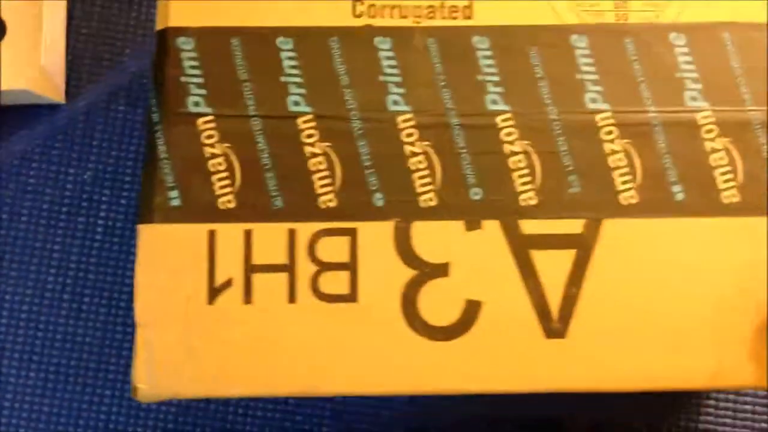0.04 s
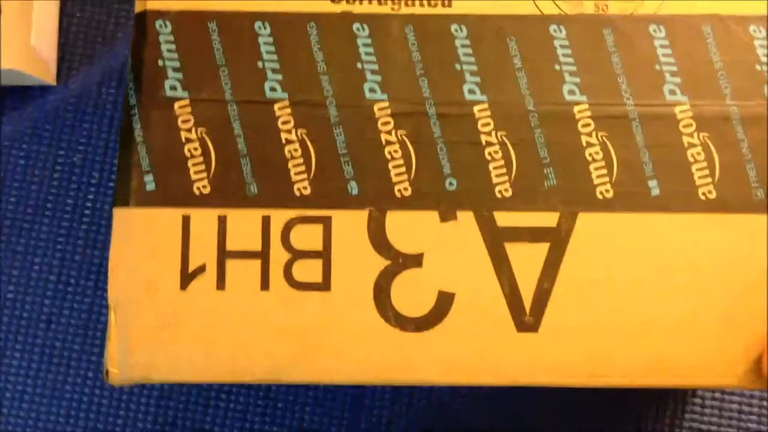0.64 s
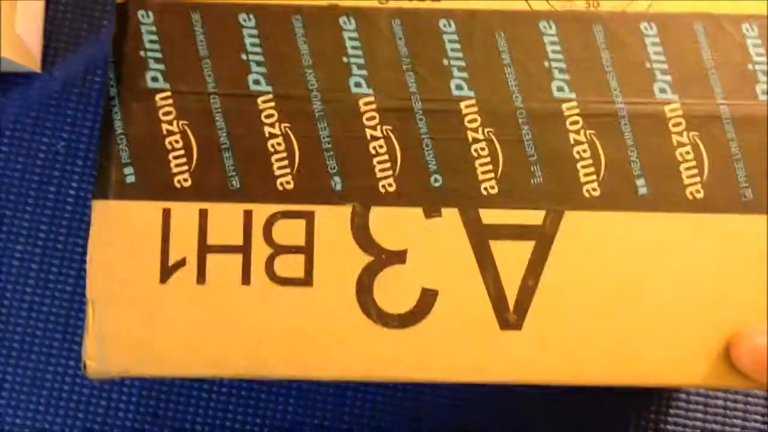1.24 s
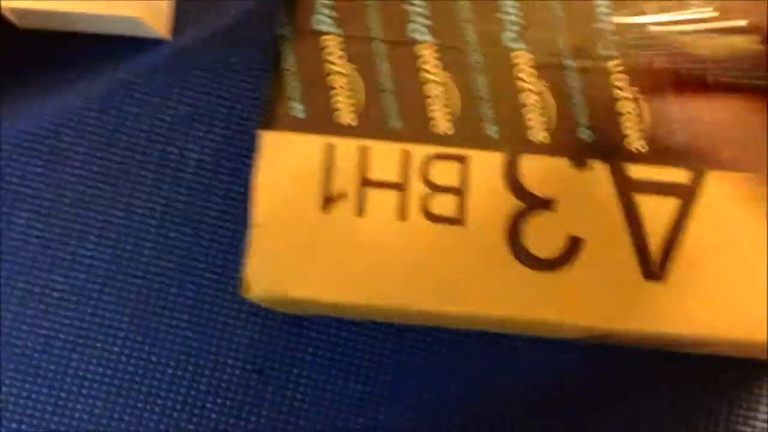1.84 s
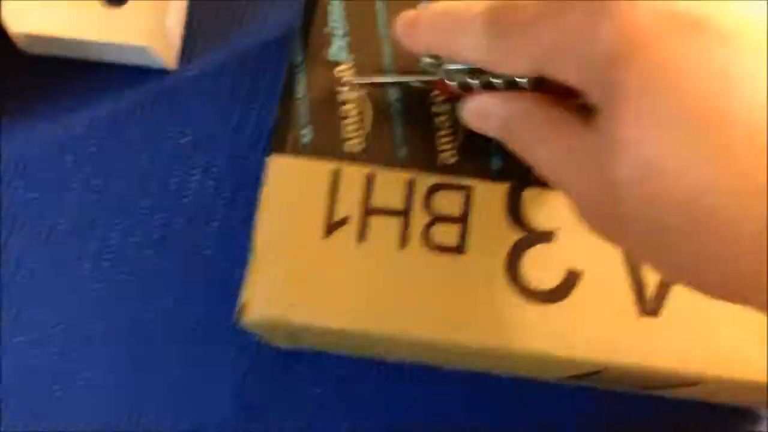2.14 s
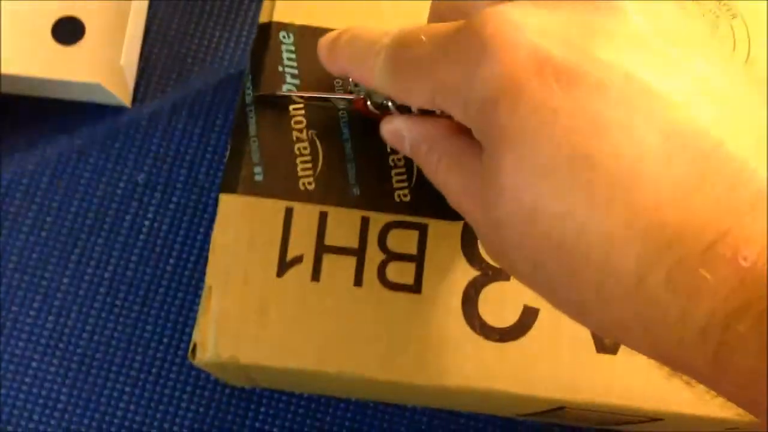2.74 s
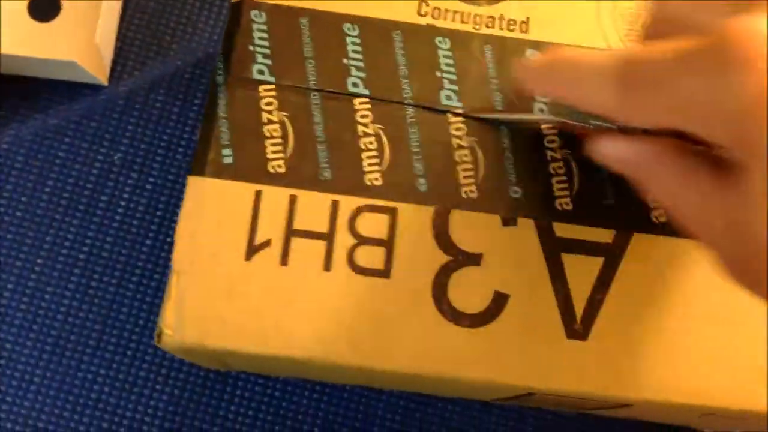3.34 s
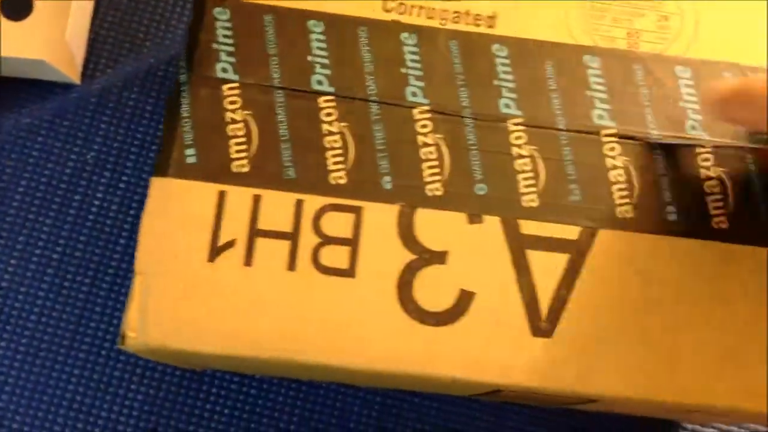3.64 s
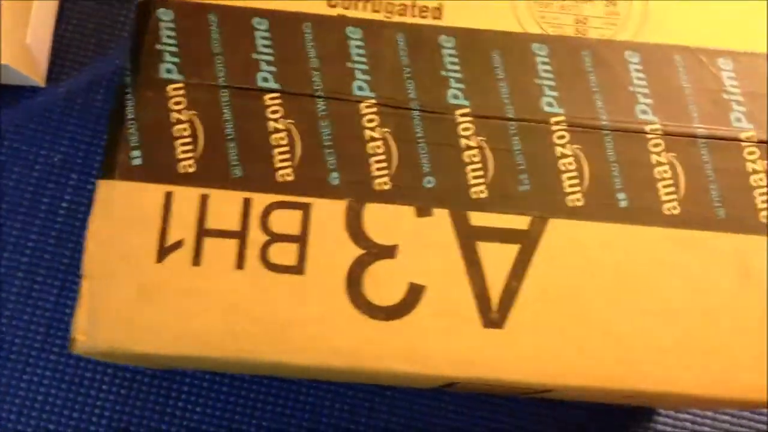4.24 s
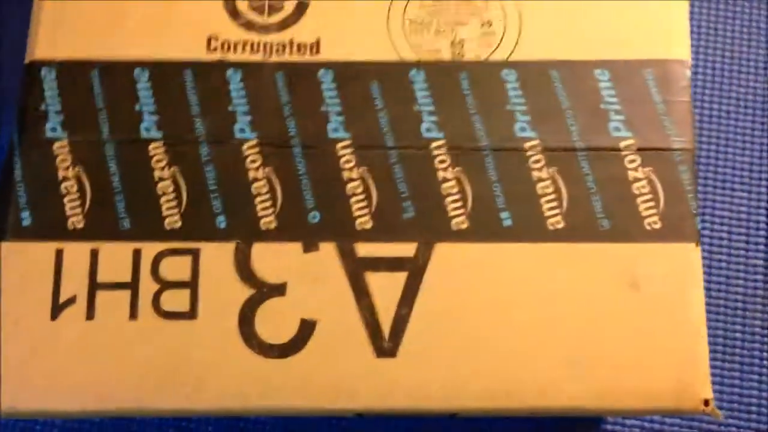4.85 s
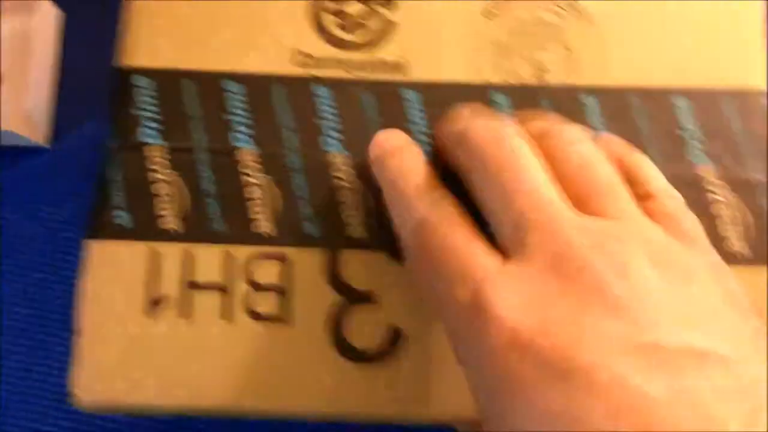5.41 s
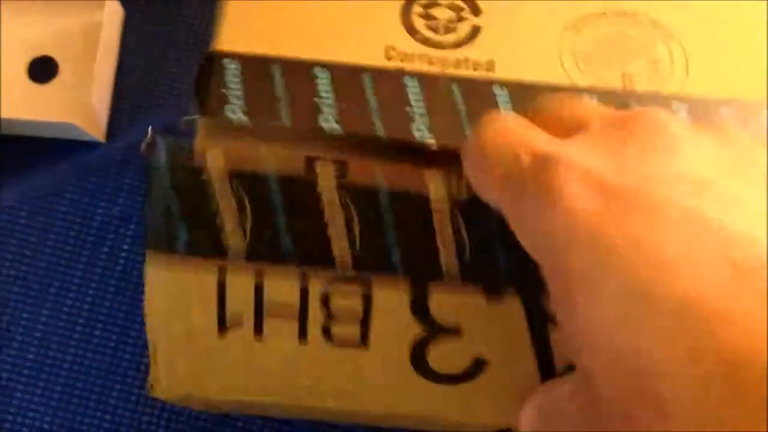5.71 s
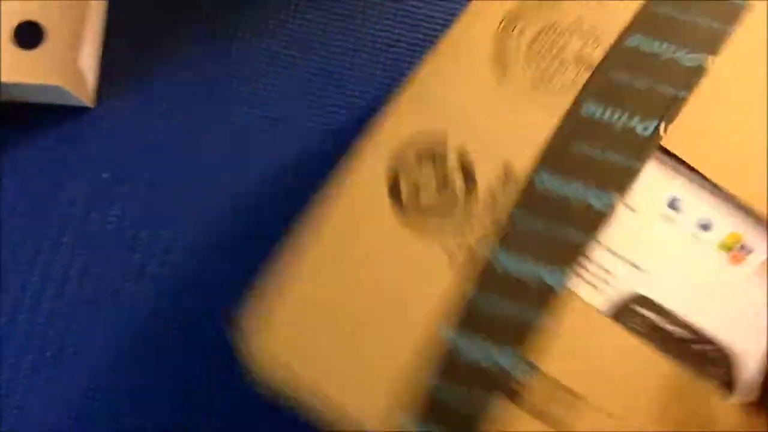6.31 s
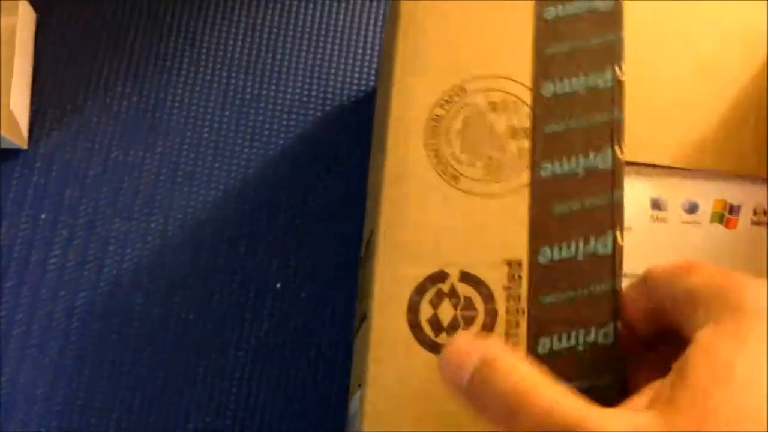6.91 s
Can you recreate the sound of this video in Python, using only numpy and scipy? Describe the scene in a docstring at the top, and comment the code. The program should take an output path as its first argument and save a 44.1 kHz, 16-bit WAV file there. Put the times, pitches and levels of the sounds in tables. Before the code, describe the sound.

Close cardboard scraping and a few tool clicks lead to a rasping cut through packing tape and flaps pulled loose.

```python
"""A small dry room, one microphone close to a taped cardboard box on a floor mat.
Something scrapes over the box; a small blade is picked up with a few clicks, pierces the tape and
slits the seam. The flaps pull loose with snaps and a squeak, and the box is turned round.
Friction is a stream of tiny slips and a snap a burst of breaking fibres, both coloured by the box;
underneath, the box bumps and rumbles on the mat."""
import sys
import numpy as np
from scipy import signal
from scipy.fft import rfft, irfft
from scipy.io import wavfile
from scipy.ndimage import uniform_filter1d

SR = 44100
rng = np.random.default_rng(int(sys.argv[2]) if len(sys.argv) > 2 else 0)


def waveform_to_disk(signal):
    """Save audio, clipped to [-1, 1], as 16-bit WAV at the path in sys.argv[1]."""
    frames = np.transpose(np.atleast_2d(signal))
    scaled = np.clip(frames, -1, 1) * 32767
    samples = np.round(scaled).astype(np.int16)
    wavfile.write(sys.argv[1], SR, samples)


N = 311774
TIME = np.arange(N) / SR


def from_db(db):
    """Decibels to gain."""
    return 10 ** (np.asarray(db) / 20)


def rms_one(x):
    """Scale to rms 1."""
    return x / np.sqrt(np.mean(x ** 2) + 1e-20)


def add(out, start_s, sound):
    """Mix a sound in at start_s."""
    start = int(start_s * SR)
    out[start:start + len(sound)] += sound[:N - start]


def band(x, edges_hz, kind="band"):
    """Steep causal band- or high-pass."""
    return signal.sosfilt(signal.butter(4, edges_hz, kind, fs=SR, output="sos"), x + 1e-18)


def coloured(x, spectrum):
    """Causal (minimum-phase) filter with the given spectrum."""
    size = 4096
    hz, db = np.transpose(spectrum)
    grid_hz = np.maximum(np.arange(size // 2 + 1) * SR / size, 1)
    gain = from_db(np.interp(np.log(grid_hz), np.log(hz), db))
    cepstrum = irfft(np.log(gain))
    cepstrum[1:size // 2] *= 2
    cepstrum[size // 2 + 1:] = 0
    return signal.fftconvolve(x, irfft(np.exp(rfft(cepstrum))))[:len(x)]


def drift(rate_hz, size=N):
    """A random wander of rms 1."""
    knots = rng.standard_normal(int(size / SR * rate_hz) + 2)
    return rms_one(np.interp(TIME[:size] * rate_hz, np.arange(len(knots)), knots))


def grains(per_s, spread_db, size):
    """Fibres letting go at random moments: many small clicks, a few large ones."""
    sizes = from_db(spread_db * np.minimum(rng.exponential(1, size), 4))
    return (rng.random(size) < per_s / SR) * sizes * rng.choice([-1, 1], size)


def ring(x, modes):
    """Sum of damped sines set off by x."""
    out = 0
    for hz, db, t60_s in modes:
        r, w = from_db(-60 / (t60_s * SR)), 2 * np.pi * hz / SR
        out = out + from_db(db) * signal.lfilter([0, np.sin(w)], [1, -2 * r * np.cos(w), r * r], x + 1e-18)
    return out


# Resonances and dips of the box as heard at the microphone, including a narrow microphone notch
# near 2.7 kHz: centre_hz, width_hz, gain_db
BOX_AT_MICROPHONE = [(164, 18, 2), (211, 15.6, 5), (267, 14, 4.5), (314, 21, 2), (398, 54, 7.5),
                     (621, 20, 5), (811.5, 36, 5.5), (1228, 410, -8.5), (1510, 63, 4), (1784, 270, 4),
                     (2110, 180, 3.5), (2390, 47, 5.5), (2736, 164, -13), (3086, 150, -5), (4120, 590, 3.5),
                     (5400, 170, 2)]
def box(x):
    """Colour a force on the cardboard with the box's resonances and dips and the microphone's notch."""
    for hz, width_hz, db in BOX_AT_MICROPHONE:
        half, tuning = np.pi * width_hz / SR, -2 * np.cos(2 * np.pi * hz / SR)
        zero, pole = half * from_db(max(db, 0)), half * from_db(max(-db, 0))
        x = signal.lfilter([1 + zero, tuning, 1 - zero], [1 + pole, tuning, 1 - pole], x)
    return x


# Edges of the cardboard's registers: low_hz, knock_hz, middle_hz, high_hz, top_hz
REGISTERS_HZ = [70, 300, 1100, 2700, 7000]
def treble(x, brightness_db):
    """The hiss of x, rms 1; brightness is its top register against the one below."""
    high, top = REGISTERS_HZ[3:]
    gain = from_db(brightness_db)
    lower, upper = rms_one(band(x, [high, top])), rms_one(band(x, top, "high"))
    return (lower + gain * upper) / np.sqrt(1 + gain ** 2)


# Room tone at the microphone: frequency_hz, level_db
AIR_COLOUR = [(15, -39), (30, -12), (62, 1), (110, -9), (170, -16.5), (350, -19.5), (800, -22.5),
              (1400, -20.5), (1950, -21), (2700, -29), (3900, -25), (15000, -30)]
def room_tone(level_db=-59.5):
    """The still air of the room, a faint low noise."""
    return from_db(level_db) * rms_one(coloured(rng.standard_normal(N), AIR_COLOUR))


# Low modes of the top panel: pitch_hz, level_db, t60_s
PANEL_MODES = [(100, -7, .08), (165, -3.5, 0.076), (213.8, -2.5, 0.099), (260, -0.5, 0.11),
               (324, -5.5, 0.087)]
# Cardboard tapped, pierced or torn: time_s, tearing_s, level_db, hardness_db, thump_db, thump_hz
CARDBOARD_SNAPS = [(0.331, 0.0046, -73, -4, -51.5, 173), (0.526, 0.0079, -42.5, -2.5, -32, 240),
                   (0.753, .009, -37.5, 1.5, -40.5, 236), (0.978, 0.0047, -43, 4.5, -45.5, 150),
                   (1.006, 0.0099, -37, 3, -40.5, 164), (1.311, .006, -36, 1, -39, 169),
                   (2.402, 0.0099, -64.5, -5.5, -52, 180), (2.453, .014, -58.5, -3, -44, 166),
                   (2.508, 0.0064, -58, -4.5, -42.5, 186), (2.569, .004, -63, -13, -40, 160),
                   (2.631, 0.0045, -68, -8, -70, 170), (2.697, 0.0066, -55.5, -1.5, -59, 185),
                   (3.143, 0.0047, -27.5, 1, -24.5, 250), (3.153, 0.0079, -27, -3, -21, 260),
                   (3.497, 0.0056, -30, -4, -23.5, 260), (4.122, 0.0044, -32, -4.5, -21.5, 273),
                   (4.985, 0.0045, -55, -3.5, -49, 170), (5.357, 0.0056, -60, -4, -46, 141),
                   (5.451, .003, -52, -0.5, -56, 160), (5.4783, .0016, -41, -8, -31, 197),
                   (5.528, 0.0057, -45.5, -3, -60, 169), (5.579, .0023, -33, -2, -35.5, 257),
                   (5.596, .011, -35, -7.5, -35, 290), (5.685, .004, -27, -2.5, -31, 261),
                   (5.7562, .0044, -21, -2, -20.5, 159), (5.833, .004, -43.5, -1, -46, 165),
                   (6.823, 0.013, -44, 2, -65, 200), (6.978, 0.0037, -35, -7, -28, 210)]
def snaps(panel_push=2.27, focus_db_per_octave=12.5, rustle_db=-19, rustle_s=0.016, board_db=2.5):
    """Fibres start to give, break, and go on tearing for a moment; the released panel thumps."""
    out, t = np.zeros(N), np.arange(-(SR // 50), SR // 6) / SR
    _, knock_hz, middle, high, _ = REGISTERS_HZ
    for time_s, tearing_s, level_db, hardness_db, thump_db, thump_hz in CARDBOARD_SNAPS:
        giving = .5 * np.exp(-np.abs(t) / (0.58 * tearing_s))
        dying = np.exp(-(t / tearing_s / 2) ** 2) + from_db(rustle_db) * np.exp(-np.abs(t) / rustle_s)
        tear = grains(per_s=6000, spread_db=3.0, size=len(t)) * np.where(t < 0, giving, dying)
        tear /= np.linalg.norm(tear)
        # quick snaps put more of their force into the first break
        jolt = (t == 0) * 0.84 * min(1, 0.0039 / tearing_s) ** 2
        push, skin = tear + panel_push * jolt, box(tear + jolt)
        # the spot that is hit favours the panel modes near one pitch
        modes = [(hz, db - focus_db_per_octave * abs(np.log2(hz / thump_hz)), t60_s)
                 for hz, db, t60_s in PANEL_MODES]
        thump = band(ring(push, modes), [thump_hz / 2, 2 * thump_hz])
        knock = band(box(push), [knock_hz, middle])
        board = band(skin, [middle, high])
        crack = treble(skin, brightness_db=-2.0)
        levels_db = thump_db, level_db - hardness_db, level_db + board_db, level_db + hardness_db
        for db, part in zip(levels_db, (thump, knock, board, crack)):   # levels: rms over 20 ms
            add(out, time_s + t[0], from_db(db) * part * np.sqrt(.02 * SR) / np.linalg.norm(part))
    return out


def touch(start_s, hold_s, db, press_db_per_s=900, lift_db_per_s=500):
    """Level in dB of a brief touch: press, hold, lift."""
    early, late = np.maximum(start_s - TIME, 0), np.maximum(TIME - start_s - hold_s, 0)
    return db - press_db_per_s * early - lift_db_per_s * late


def touches(rows):
    """Force and hardness of a series of brief touches; the strongest leads."""
    levels = np.array([touch(*row[:3]) for row in rows])
    return levels.max(axis=0), np.array(rows)[levels.argmax(axis=0), 3]


def drawn(curve):
    """Force and hardness of one long stroke, silent outside it."""
    times_s, *columns = np.transpose(curve)
    force_db, hardness_db = [np.interp(TIME, times_s, column) for column in columns]
    return np.where((TIME > times_s[0]) & (TIME < times_s[-1]), force_db, -np.inf), hardness_db


def travelling(x):
    """Reflections from the box edges arrive sooner or later as the contact moves: a shifting comb."""
    out, t = x, TIME[:len(x)]
    for k, lag_s in enumerate(np.geomspace(.00025, .002, 4)):
        moving_lag_s = lag_s * np.exp(.35 * drift(4, len(x)))
        out = out + .26 * (-1) ** k * np.interp(t - moving_lag_s, t, x)
    return out


def stroke(control, colour, body_db, hiss_db, brightness_db,
           slips_per_s, spread_db, catch_db, catch_hz, snags=()):
    """Dense slips, stronger where the edge catches, shake box and board and hiss at the contact."""
    touching = control[0] > -90
    force_db, hardness_db = [column[touching] for column in control]
    size = len(force_db)
    rasp_db = sum(db * np.exp(-((TIME[touching] - s) / half_s) ** 2) for s, half_s, db in snags)
    slips = grains(slips_per_s, spread_db, size) * from_db(catch_db * drift(catch_hz, size))
    sound = box(coloured(travelling(slips), colour))
    low, _, middle, high, _ = REGISTERS_HZ
    # a harder contact trades the box's body for hiss
    body = from_db(body_db - hardness_db) * rms_one(band(sound, [low, middle]))
    board = from_db(rasp_db) * rms_one(band(sound, [middle, high]))
    hiss = from_db(hiss_db + hardness_db) * treble(sound, brightness_db + hardness_db / 2)
    out = np.zeros(N)
    out[touching] = from_db(force_db) * (body + board + hiss)
    return out


# Scraped cardboard, close up: frequency_hz, level_db
SCRAPED_COLOUR = [(50, -15), (90, -4), (186, -1), (300, -10), (400, -6), (530, -11), (910, -4.5),
                  (1300, -9), (1650, -6.5), (1850, -1), (2100, -11.5), (2600, -12), (7500, -14),
                  (16000, -14.5)]
# Light contacts with the box: start_s, hold_s, force_db, hardness_db
GRAZE_TOUCHES = [(0.47, 0.087, -58, 0.5), (0.765, 0.028, -45, 0.5), (0.885, 0.022, -55, -1),
                 (1.47, 0.022, -48, -0.5), (1.52, 0.057, -50, -0.5)]
def grazes():
    """Something brushes the box before and after the long scrape."""
    return stroke(touches(GRAZE_TOUCHES), SCRAPED_COLOUR, body_db=-7.5, hiss_db=-3, brightness_db=1.0,
                  slips_per_s=12000, spread_db=2.6, catch_db=1.4, catch_hz=180)


# Rumble down at the mat: frequency_hz, level_db
RUMBLE_COLOUR = [(30, -27), (60, 4), (85, 0), (170, -4), (300, -19), (800, -57.5)]
# The box nudged along the mat: start_s, hold_s, level_db
MAT_NUDGES = [(0.649, 0.039, -46.5), (1.202, 0.1, -48), (1.852, .45, -58.5), (4.27, .16, -55.5),
              (5.348, 0.028, -48.5), (5.928, .07, -44.5), (6.546, 0.1295, -50.5), (6.89, .16, -48.5)]
def mat_rumble(friction, drag_db=-43, drag_exponent=0.44):
    """The box rumbles on the mat when it is nudged and whenever a stroke drags at it."""
    force = np.sqrt(np.abs(uniform_filter1d(friction ** 2, size=SR // 20)))
    dragged = from_db(drag_db) * force ** drag_exponent
    nudged = sum(from_db(touch(*row)) for row in MAT_NUDGES)
    return np.hypot(dragged, nudged) * rms_one(coloured(rng.standard_normal(N), RUMBLE_COLOUR))


# One pass over the box: time_s, force_db, hardness_db
SCRAPE_CURVE = [(0.948, -73, 0), (0.958, -48, -3), (1.04, -39, 0), (1.175, -37.5, 0.5), (1.21, -33, 2.5),
                (1.3, -35, 2.5), (1.335, -38, -2.5), (1.39, -46.5, 1), (1.45, -61, -3)]
def scrape():
    """Something drags over the cardboard in one long, hissing stroke."""
    return stroke(drawn(SCRAPE_CURVE), SCRAPED_COLOUR, body_db=-5.0, hiss_db=-0.8, brightness_db=2.5,
                  slips_per_s=12000, spread_db=2.6, catch_db=1.5, catch_hz=200)


# The whole box on the mat: pitch_hz, level_db, t60_s
BOUNCE_MODES = [(48, -16, 0.11), (76.6, -3.5, 0.11), (102.3, 2, 0.1)]
# Its bounces: start_s, peak_db
MAT_BUMPS = [(1.311, -37), (3.143, -36), (3.497, -33), (4.122, -28), (4.985, -45), (5.479, -38),
             (5.757, -20.5), (6.979, -39)]
def bumps():
    """The hardest jerks bounce the box on the soft mat."""
    out = np.zeros(N)
    bounce = band(ring(signal.unit_impulse(SR // 4), BOUNCE_MODES), 42, "high")
    for start_s, peak_db in MAT_BUMPS:
        add(out, start_s, from_db(peak_db) * bounce / np.abs(bounce).max())
    return out


# The blade tool, damped by the hand: pitch_hz, level_db, t60_s
TOOL_MODES = [(1900, 0, .011), (2150, 0, .013), (3250, -3, .009), (3550, -1, .016), (4750, -3, .008),
              (6400, -6, .005), (11000, -3, .004), (13200, -2, .005), (14300, -3, .007)]
# Its small hard contacts: start_s, level_db, pitch_hz, rattle_s, ring_db
TOOL_CLICKS = [(1.727, -32.5, 3500, 0.009, -5), (1.762, -28.5, 2080, 0.0028, 17),
               (1.802, -41, 4700, .004, -12), (2.003, -37.5, 6000, 0.0086, -13),
               (2.035, -28.5, 13500, .007, -5), (2.484, -33.5, 13000, .001, -16),
               (2.859, -38.5, 9000, .002, -17), (4.357, -44.5, 2050, .005, -10),
               (4.496, -44, 4770, .008, -14), (4.569, -31, 3560, .005, -6.5),
               (4.766, -42.5, 4800, .004, -14), (4.984, -33.5, 4000, .007, -1.5),
               (4.992, -32, 3000, 0.0064, -4.5)]
def tool_clicks(gain_db=3.5, focus_db_per_octave=7.0, tick_gain=4.4, rattle_gain=0.39, scatter=0.05):
    """A dry tick and a brief rattle ring the tool around one pitch; each grip shifts its modes a little."""
    out, t = np.zeros(N), TIME[:SR // 8]
    for start_s, level_db, pitch_hz, rattle_s, ring_db in TOOL_CLICKS:
        rattle = grains(per_s=5000, spread_db=2.6, size=len(t)) * np.exp(-t / rattle_s)
        force = (t == 0) / 2 + rattle_gain * rattle
        shifts = np.exp(scatter * rng.uniform(-1, 1, len(TOOL_MODES)))
        modes = [(hz * shift, db - focus_db_per_octave * abs(np.log2(hz / pitch_hz)), t60_s)
                 for (hz, db, t60_s), shift in zip(TOOL_MODES, shifts)]
        # softer contacts, which ring lower, also tick duller
        top_db = -5.5 * np.log2(16000 / pitch_hz)
        tick = tick_gain * coloured(force, [(700, -23), (1800, -4), (4500, 3.5), (16000, top_db)])
        sound = band(from_db(ring_db) * ring(force, modes) + tick, min(0.71 * pitch_hz, 3000), "high")
        add(out, start_s, from_db(level_db + gain_db) * sound / np.abs(sound).max())
    return out


# Rubbed cardboard, close up: frequency_hz, level_db
RUBBED_COLOUR = [(50, -18), (100, -4), (170, 4), (336, -9), (695, -4), (1070, -6.5), (2120, -6.5),
                 (4580, -12), (6300, -21), (16000, -26.5)]
# Fingers on the box: start_s, hold_s, force_db, hardness_db
FINGER_TOUCHES = [(2.185, .07, -64.5, -5), (2.41, 0.1, -63, -1.5), (5.6, .015, -37.5, -1.5),
                  (5.975, 0.026, -48, 6.5), (6.83, 0.037, -48, 1.5), (6.88, 0.082, -50, 0.5),
                  (7.01, 0.061, -51.5, -6)]
def fingers():
    """Fingers slide on tape and board with sparser, uneven slips."""
    return stroke(touches(FINGER_TOUCHES), RUBBED_COLOUR, body_db=1.0, hiss_db=-2.5, brightness_db=0.6,
                  slips_per_s=3000, spread_db=3.0, catch_db=2.0, catch_hz=120)


# The cut, close up: frequency_hz, level_db
BLADE_COLOUR = [(50, -26), (110, -9), (165, -0.5), (460, -1), (710, -3), (1200, -1), (2100, -0.5),
                (2700, -6), (4280, -6.5), (5140, -14.5), (10000, -18.5), (16000, -22)]
# Snags where the board rasps: time_s, half_length_s, boost_db
BLADE_SNAGS = [(3.39, 0.03, 5), (3.612, 0.016, 8), (3.69, .018, 8), (3.8, .05, 2.5)]
# The blade along the seam: time_s, force_db, hardness_db
BLADE_CURVE = [(2.85, -82, -4), (2.93, -57.5, 0), (3.1, -49.5, 1), (3.13, -38, 1), (3.21, -40, -1.5),
               (3.3, -34, -0.5), (3.48, -31.5, 0.5), (3.69, -36, -1), (3.73, -42.5, -1),
               (3.78, -34.5, -2.5), (4.03, -37, 2), (4.07, -46.5, 1), (4.12, -41.5, 1.5), (4.18, -73, 0)]
def slit():
    """The blade finds the seam, sinks in and is drawn along it, stalling once."""
    return stroke(drawn(BLADE_CURVE), BLADE_COLOUR, body_db=-1.0, hiss_db=-3.2, brightness_db=-1.6,
                  slips_per_s=11000, spread_db=2.6, catch_db=1.26, catch_hz=280, snags=BLADE_SNAGS)


# The pull on the flaps: time_s, force_db, hardness_db
FLAP_CURVE = [(5.35, -66, 5), (5.43, -48.5, 1.5), (5.54, -48.5, -1.5), (5.655, -46, -1), (5.72, -33.5, 0.5),
              (5.785, -41.5, 2), (5.83, -45, 0), (5.93, -45.5, -1.5), (6.04, -55.5, -0.5)]
def flaps():
    """The flaps rub past each other as they are pulled up."""
    return stroke(drawn(FLAP_CURVE), RUBBED_COLOUR, body_db=-0.5, hiss_db=-4, brightness_db=1.0,
                  slips_per_s=9000, spread_db=2.8, catch_db=1.5, catch_hz=100)


def stick_slip(modes, slip_hz, jitter):
    """Cardboard sticks and lets go at an unsteady rate, ringing its modes."""
    cycles = np.cumsum(slip_hz * np.exp(jitter * drift(500))) / SR
    slips = np.diff(np.floor(cycles), prepend=0)
    return rms_one(band(ring(slips, modes), 140, "high"))


# The squeaking flap edge: pitch_hz, level_db, t60_s
EDGE_MODES = [(877, -1.5, 0.043), (1090, -22, .02), (1350, 10, 0.036), (1587, 9.5, 0.027),
              (2010, -2, 0.039), (2540, -11, 0.038), (3080, -19, .02)]
def squeak(time_s=5.889, level_db=-14, swell_s=0.0046, hiss_db=-19):
    """One flap slips past the other with a short chirp."""
    hiss = rms_one(coloured(rng.standard_normal(N), [(100, -13), (2000, -8), (5000, -2), (15000, -13)]))
    sound = stick_slip(EDGE_MODES, slip_hz=789, jitter=.2) + from_db(hiss_db) * hiss
    return from_db(level_db) * np.exp(-np.abs(TIME - time_s) / swell_s) * sound


# Turning the box: time_s, force_db, hardness_db
TURN_CURVE = [(6.02, -54, -3), (6.13, -47, -3.5), (6.482, -43, -2), (6.594, -47, -2.5), (6.6, -40, -7),
              (6.646, -52.5, 2), (6.71, -51.5, 3.5), (6.776, -66.5, 8), (6.81, -49.5, -4)]
def turn():
    """The box is turned round with a smooth rub of fine, dense slips."""
    return stroke(drawn(TURN_CURVE), RUBBED_COLOUR, body_db=-4.5, hiss_db=-0.5, brightness_db=1.5,
                  slips_per_s=18000, spread_db=2.0, catch_db=1.0, catch_hz=92)


# The flap under the thumb: pitch_hz, level_db, t60_s
FLAP_MODES = [(230, -15, 0.037), (480, -6, .015), (603, 2, 0.033), (1070, 6, 0.021), (1170, -6, .015),
              (1820, -14, .015), (3180, -10, .012)]
def judder(start_s=7.0, level_db=-42, rise_s=0.024):
    """The gripped flap rasps as it is bent."""
    sound = stick_slip(FLAP_MODES, slip_hz=560, jitter=.6)
    return from_db(level_db) * np.clip((TIME - start_s) / rise_s, 0, 1) * sound


def room(x, wet_db=-17, t60_s=0.13, wall_hz=5000, delay_s=.005):
    """This close to the box, the walls add only a weak, short, dull tail."""
    t = TIME[:SR // 2]
    tail = rng.standard_normal(len(t)) * from_db(-60 * t / t60_s) * (t > delay_s)
    tail = signal.lfilter(*signal.butter(1, wall_hz, fs=SR), tail)
    return x + from_db(wet_db) * signal.fftconvolve(x, tail / np.linalg.norm(tail))[:N]


def scene():
    """Strokes and blows on the box, in mono, over its rumble and the room tone."""
    friction = scrape() + grazes() + slit() + fingers() + flaps() + turn()
    air = room_tone()
    handling = friction + snaps() + bumps() + tool_clicks() + squeak() + judder()
    return (room(handling) + mat_rumble(friction) + air)[None]


def record(dry):
    """The microphone signal is cut steeply above 15.4 kHz."""
    return signal.sosfilt(signal.ellip(12, .1, 80, 15400, fs=SR, output="sos"), dry)


dry = scene()
out = record(dry)
waveform_to_disk(out)
```